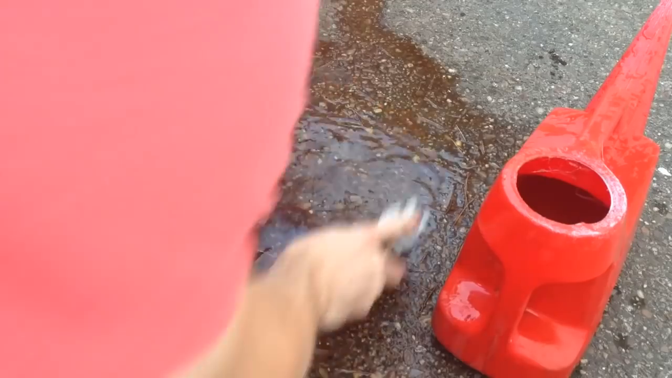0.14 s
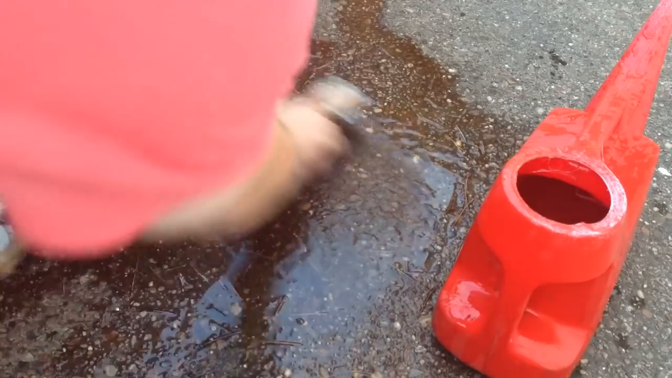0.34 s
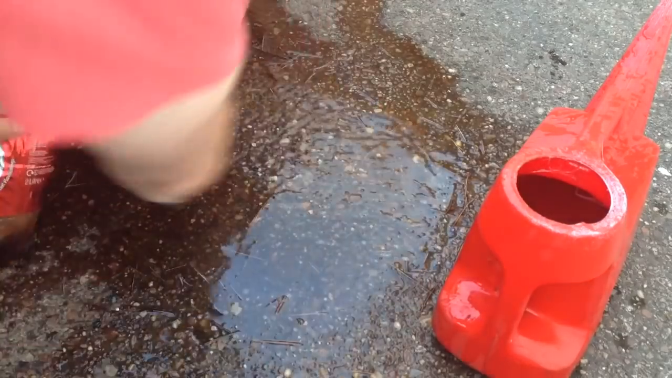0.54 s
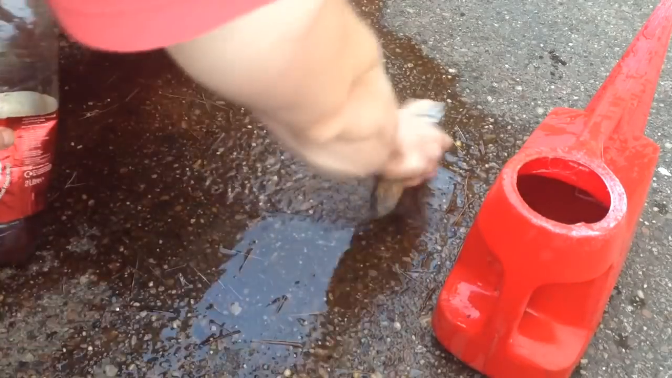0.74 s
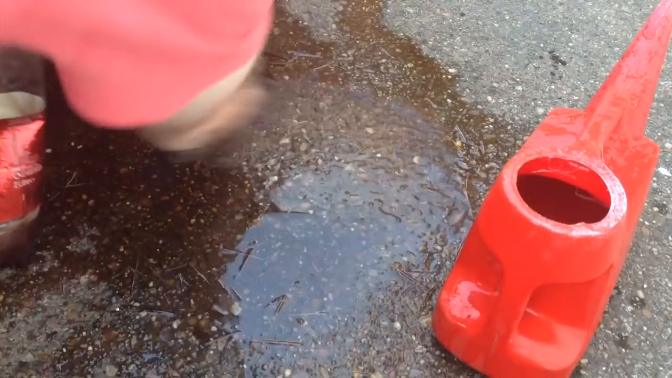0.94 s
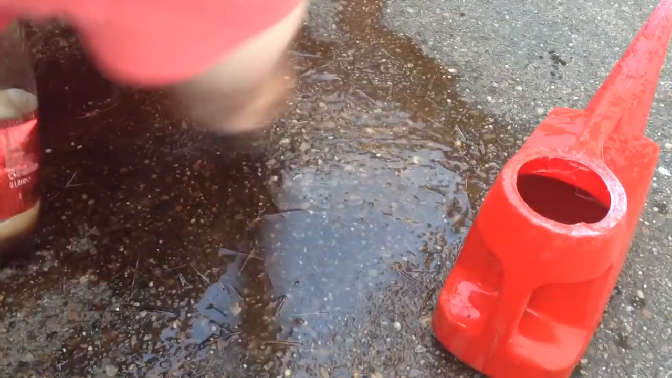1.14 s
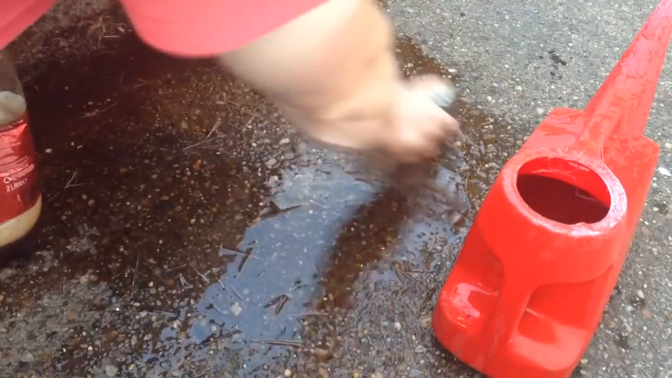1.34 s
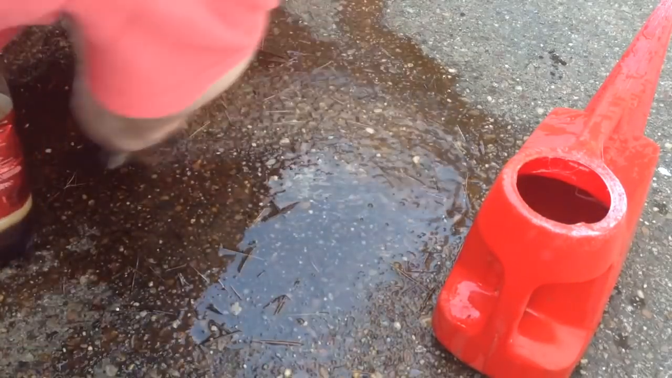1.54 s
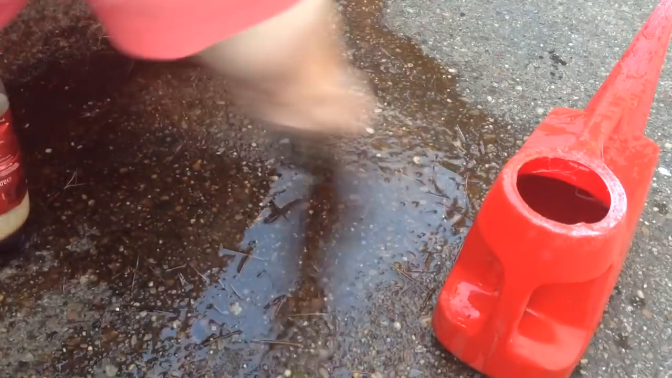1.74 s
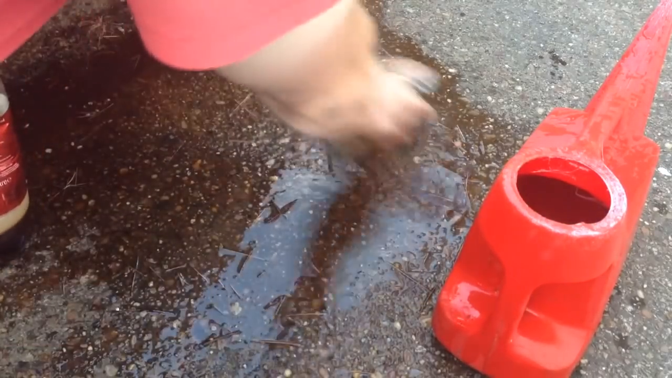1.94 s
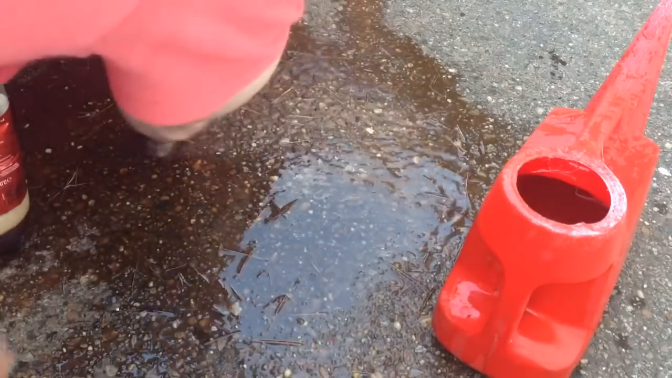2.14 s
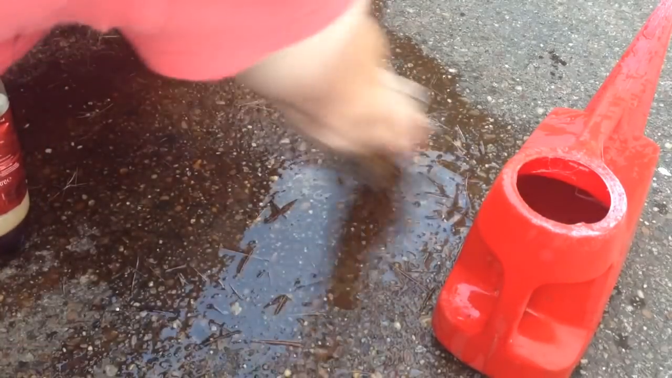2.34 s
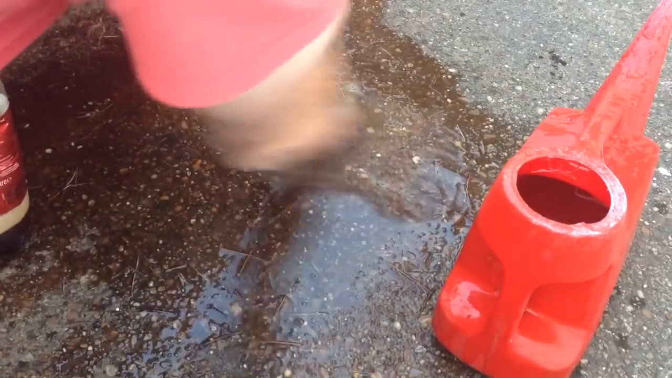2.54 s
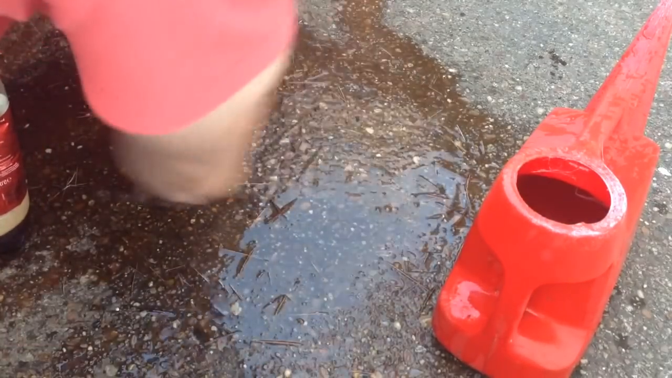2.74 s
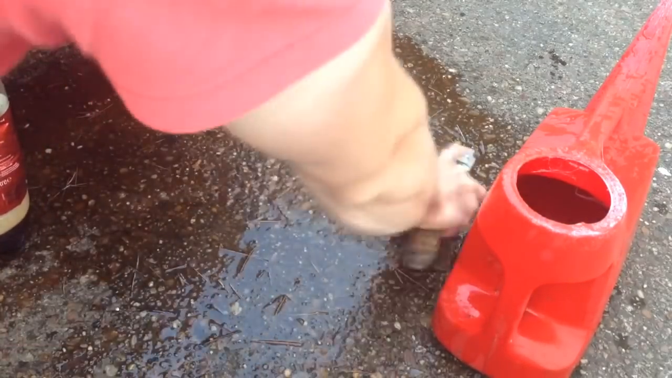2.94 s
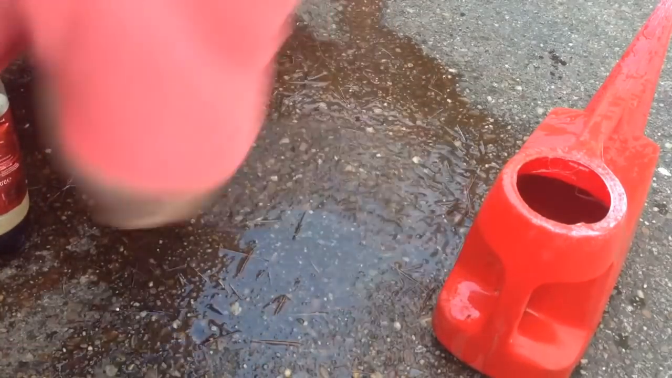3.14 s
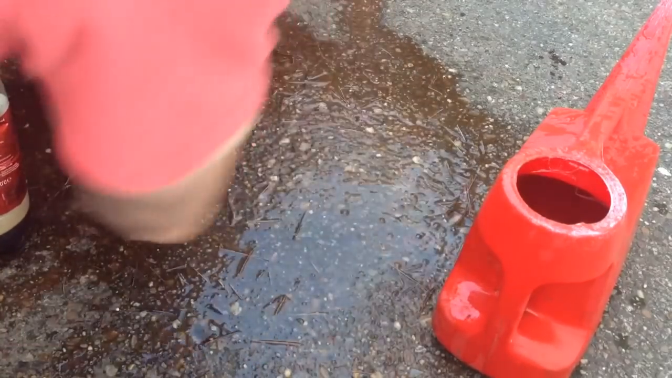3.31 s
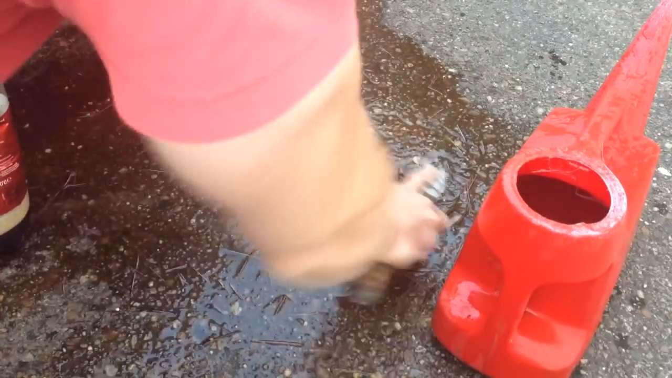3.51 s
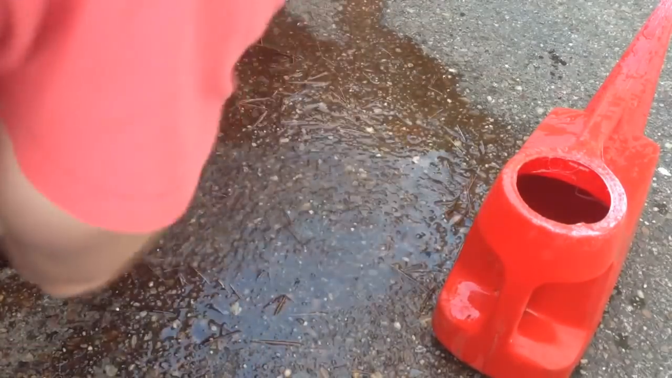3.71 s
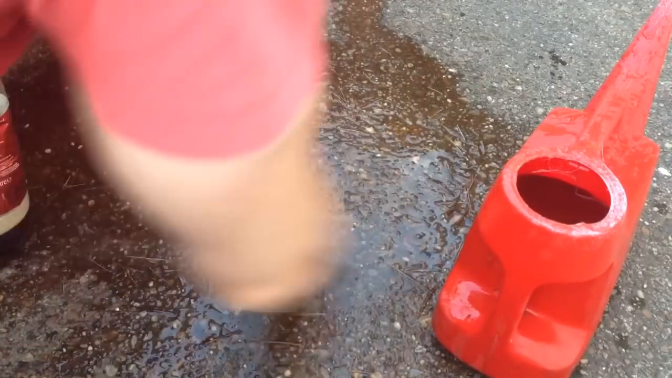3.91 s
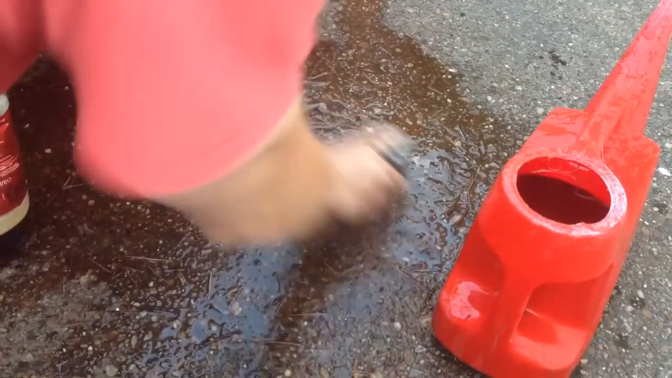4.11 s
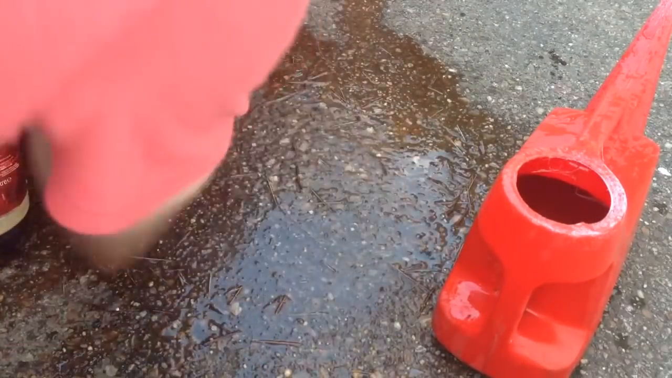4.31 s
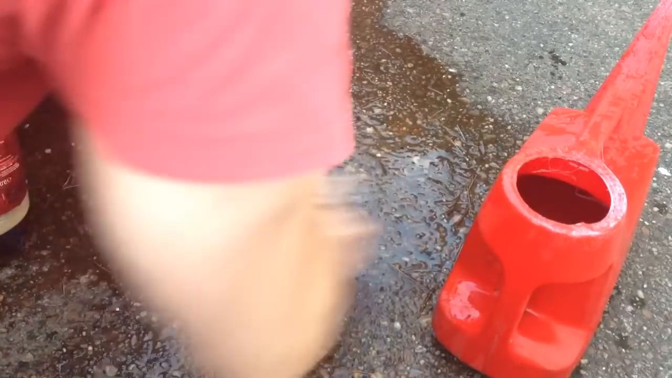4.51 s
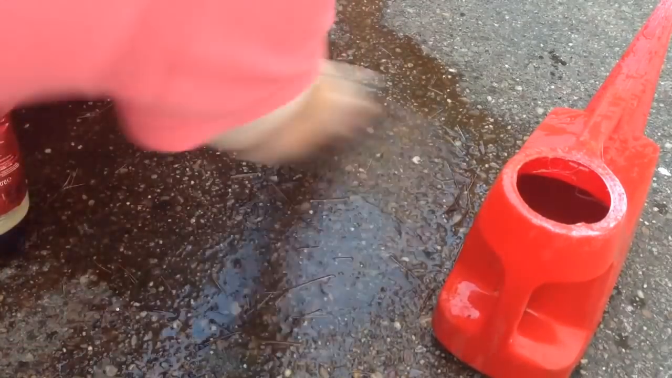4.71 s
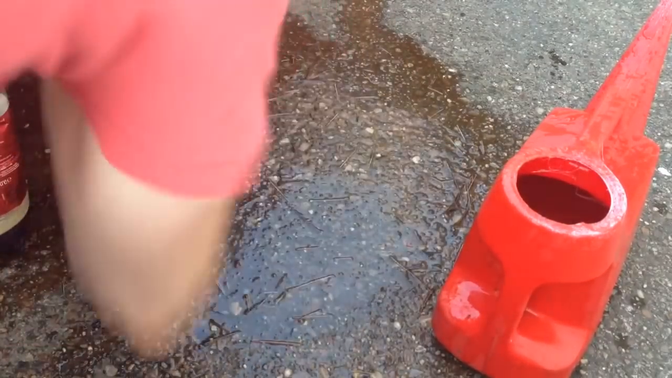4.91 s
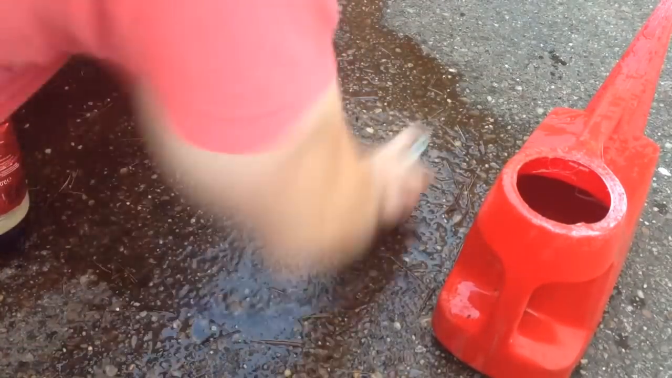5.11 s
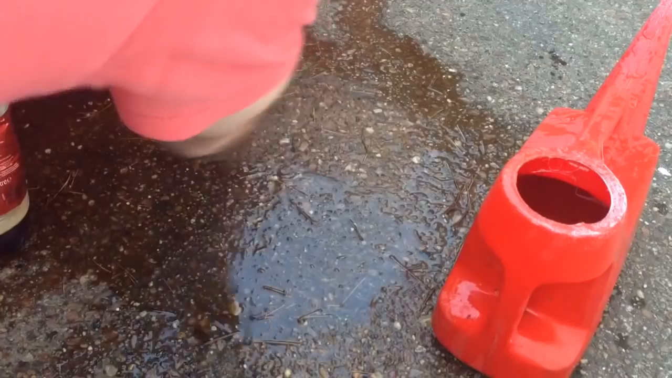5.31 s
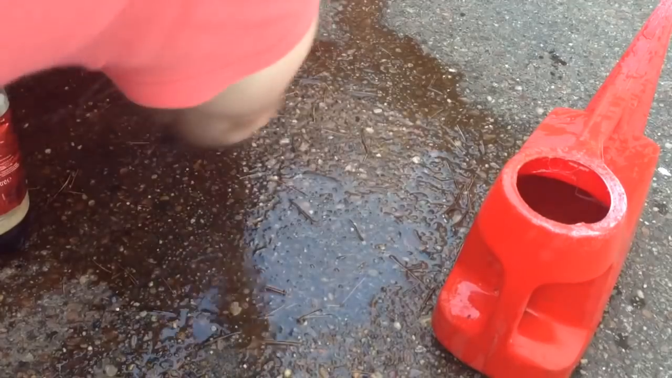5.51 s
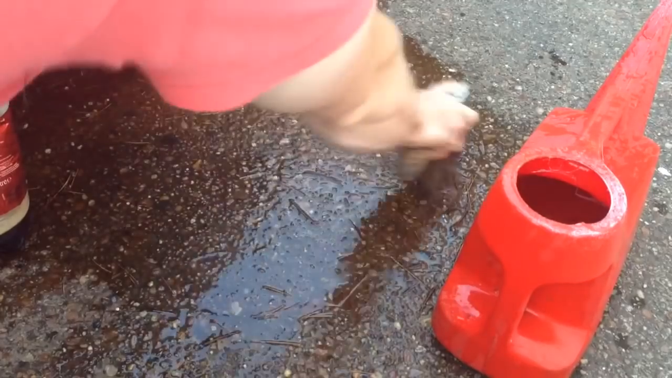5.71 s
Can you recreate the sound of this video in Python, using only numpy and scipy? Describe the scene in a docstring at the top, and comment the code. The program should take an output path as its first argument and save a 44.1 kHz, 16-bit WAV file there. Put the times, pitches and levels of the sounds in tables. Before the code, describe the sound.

After a few quiet knocks, coarse bristles scrape rapidly over soaked gritty ground, each short stroke a bright scratchy swish with wet bubbling in it. Soft low thuds and one hard wooden-sounding clack accompany the first strokes. The rhythm later becomes a continuous, uneven swirl. The microphone is near, outdoors, with hardly any echo and the same sound on both sides.

```python
"""A stiff hand brush scrubs wet concrete outdoors, over a faint bed of outdoor air.
First come light ticks and dull bumps: decaying modes of the block and short bursts of noise.
Then the brush goes back and forth: bristle tips catch on grit and flick free by the thousand
(random impulses, filtered), churning the water film (bubble rings); a sharp clack falls early on.
Later it scrubs in circles without a break, and a last stroke begins. Both channels are alike."""
import sys
import numpy as np
from scipy import signal
from scipy.fft import rfft, irfft, next_fast_len
from scipy.io import wavfile
from scipy.ndimage import map_coordinates

SR = 44100
rng = np.random.default_rng(int(sys.argv[2]) if len(sys.argv) > 2 else 0)


def wrap_up_sound(samples):
    """Save the sound to the file named by the first command line argument, as 16-bit audio."""
    columns = np.atleast_2d(samples).T
    # keep every value between -1 and 1, then stretch to whole-number steps
    tamed = np.clip(columns, -1, 1)
    steps = np.round(tamed * 32767).astype(np.int16)
    wavfile.write(sys.argv[1], SR, steps)


N = 254016  # samples

# Levels in the tables are relative: each source adds its own gain in the mix.
# Back-and-forth strokes: start t/s, length/s, attack/s, rasp level/dB, sag over the stroke/dB,
# level of the skimming before it/dB, water churn level re rasp/dB
STROKES = [ (0.305, 0.3, 0.041, -27.5, -3, -38.5, -15.5), (0.601, 0.25, 0.04, -23, -21, -39.5, -13.5),
           (0.849, 0.29, 0.125, -24.5, 12.5, -37, -10), (1.181, 0.21, 0.035, -20.5, -3.5, -40.5, -9.5),
           (1.428, 0.24, 0.064, -22.5, 2.5, -41.5, -10), (1.657, 0.29, 0.17, -21.5, 1, -50, -9.5),
           (1.975, 0.28, 0.098, -26, 9.5, -43, -11), (2.244, 0.28, 0.12, -24, 2.5, -53, -11),
           (2.556, 0.27, 0.046, -25.5, 16, -41, -12), (2.83, 0.23, 0.068, -22, 5, -44, -11.5),
           (3.108, 0.23, 0.033, -22, 2.5, -41.5, -10.5), (3.381, 0.23, 0.053, -23.5, 3, -41, -11.5),
           (3.659, 0.21, 0.041, -22.5, 9, -41.5, -8), (3.912, 0.21, 0.059, -22.5, 7, -44.5, -13),
           (5.512, 0.28, 0.086, -22.5, -4.5, -52, -14)]
# Bristles turning over at some turns of the hand: t/s, rasp level/dB
BRISTLE_FLIPS = [(1.933, -27.5), (2.53, -29), (2.786, -39), (3.334, -52)]
# An unbroken spell of circles: t/s, rasp level/dB, churn level re rasp/dB, spray level re rasp/dB
CIRCLING = [(4.09, -42, -13, -5), (4.116, -39, -7, -4), (4.156, -29, -10.5, -11), (4.208, -23.5, -7, -6),
            (4.422, -31.5, -9.5, -5), (4.468, -23.5, -10.5, -9.5), (4.572, -22, -12.5, -8),
            (4.682, -27.5, -4.5, -5.5), (4.754, -21.5, -9, -6), (4.852, -29.5, -3, -2),
            (4.888, -24.5, -11, -5.5), (4.948, -34, -3, -5), (5.046, -22.5, -11, -12),
            (5.082, -30.5, -3.5, -7.5), (5.324, -28, 0, -6), (5.434, -30.5, -6.5, -6),
            (5.478, -37, -9, -4.5), (5.51, -58, -6, -6)]

# Spectral shapes, as filter gains: f/Hz, level/dB
RASP_SHAPE = [(880, -37.5), (1500, -13), (1790, -6), (2200, -9.5), (2520, -4), (3340, -1), (3830, -1),
              (4850, -3), (6250, -1.5), (12900, -14.5), (14800, -22), (15500, -32)]  # bristles on grit
FILM_SHAPE = [(400, -43), (750, -33), (1000, -13.5), (1300, -10.5), (1800, -0.5), (2150, 0.5), (2900, -9),
              (5000, -40)]  # bubbles in the water film
WAVE_SHAPE = [(400, -42), (750, -12), (1000, -18.5), (1280, -3), (1550, -8), (2000, 2), (3000, -42)]  # bubbles in the pushed water
SPRAY_SHAPE = [(4000, -40), (6800, -2), (8300, 0.5), (10500, -1.5), (13000, -4), (15500, -8.5)]  # fine spray
RUMBLE_SHAPE = [(30, -23), (90, -19), (170, -2), (300, -6), (450, -1), (900, 0), (1600, -15.5)]  # shaken brush block
SCUFF_SHAPE = [(60, -21), (200, -16), (450, 8.5), (750, -3), (1200, 7), (2000, -6), (4000, -29),
               (9000, -52)]  # contact noise of the bumps
AIR_SHAPE = [(25, -11), (70, -8.5), (200, -8), (500, -12.5), (1200, -22), (4000, -18), (15000, -18.5)]  # outdoor background

# Bristle resonances: f/Hz, width of one resonator/Hz, level/dB
TUFT_MODES = [(2420, 380, -0.5), (2893, 300, 0.5), (3830, 460, 3.5), (4256, 270, -3), (6160, 530, -5.5)]
# Dull bumps: t/s, level/dB, f/Hz, t60 of the swing/s, contact noise level re bump/dB
BUMPS = [(0.001, -36, 75.4, 0.038, -33), (0.071, -47, 260, 0.029, -3), (0.148, -37, 300, 0.017, -30),
         (0.221, -42, 273, 0.027, -1.5), (0.569, -26.5, 203, 0.032, -21.5), (0.616, -17, 206, 0.036, -28),
         (0.677, -22.5, 295, 0.035, -3), (0.706, -32.5, 184, 0.07, -10), (0.878, -42, 103, 0.068, -25.5),
         (0.985, -40, 240, 0.03, -17), (1.080, -34.5, 204, 0.044, -1), (1.256, -47, 221, 0.071, -20),
         (1.571, -25.5, 197, 0.033, -7.5), (1.606, -44.5, 218, 0.12, 2), (1.829, -37.5, 185, 0.067, -1),
         (3.32, -57, 119, 0.17, 0), (3.99, -55, 64.5, .2, -6)]
# Hard contacts of the brush: t/s, peak level/dB, pitch re the block's modes, t60/s
CLACKS = [(0.031, -39, 2.8, 0.01), (0.087, -42, 1, 0.047), (0.187, -44, 2.2, 0.0088),
          (0.196, -37.5, 1.7, 0.02), (0.215, -38, 3.4, 0.0064), (0.6777, -7, 1.06, 0.029),
          (0.690, -18, 0.87, 0.03), (2.542, -27, 1.6, 0.021), (3.344, -27, 2, 0.016)]
# Modes of the brush block: f/Hz, level/dB
BLOCK_MODES = [(1570, -8), (2020, -4), (2330, 7), (2620, 5.5), (3800, -3), (4500, -5)]

RELEASE_S, ARCH_DB = 0.097, 4  # the hand slows before each turn; both ends lie under the middle
PILE_UP_DB = 4.6  # more water is churned as it piles up ahead of the brush
SKIM_S, SKIM_FADE_S, SKIM_CHURN_DB = 0.06, 0.023, -19  # tips skim the wet ground before they bite
SPRAY_DB = -5.5  # nominal level of strokes' fine spray re rasp
FLIP_ATTACK_S, FLIP_T60_S = 0.016, 0.18
CIRCLING_DB, CIRCLING_FADE_S = 1, 0.02
TOUCH_S, REST_DB, REST_CHURN_DB = 0.19, -50.5, -6  # once down, the brush never leaves the water
TOP_HZ = 15480  # upper band limit


def scrubbing():
    """Stick-slip friction: faster strokes flick more bristles, churn more water and shake the block."""
    rasp_db, churn_db, spray_db = hand()
    speed = amp(0.5 * (rasp_db - rasp_db.max()))  # 1 at the loudest moment
    rate = 1200 + 12000 * speed  # flicks per second
    layers = bristles(rate, speed, rasp_db, churn_db)
    layers += amp(rasp_db + spray_db + 0.5) * coloured(flicks(rate, scatter_db=3.0), SPRAY_SHAPE)
    layers += amp(rasp_db + churn_db - 1.6) * water(churn_db)
    layers += rumble(rate, rasp_db + churn_db)
    return snags(rate=130, life=0.0067, depth=0.17) * layers


def hand():
    """Power addition of all moves, giving levels in dB: rasp, then churn and spray re rasp."""
    t = np.arange(N) / SR
    # each move: rasp gain, churn dB re rasp, spray dB re rasp
    resting = amp(REST_DB) * ease((t - TOUCH_S) / SKIM_FADE_S)
    moves = [(resting, REST_CHURN_DB, SPRAY_DB)]
    for start, length, attack, db, sag_db, skim_db, churn_db in STROKES:
        age = t - start
        travel = np.clip(age / length, 0, 1) - 0.5  # -0.5 to 0.5 along the stroke
        push_db = db - sag_db * travel - ARCH_DB * (2 * travel) ** 2
        push = ease(age / attack) * ease((length - age) / RELEASE_S) * amp(push_db)
        moves.append((push, churn_db + PILE_UP_DB * travel, SPRAY_DB))
        skim = ease((age + SKIM_S) / SKIM_FADE_S) * ease((attack - age) / SKIM_FADE_S)
        moves.append((skim * amp(skim_db), SKIM_CHURN_DB, SPRAY_DB))
    for start, db in BRISTLE_FLIPS:
        age = t - start
        flip = ease(age / FLIP_ATTACK_S) * amp(db - 60 * np.maximum(age, 0) / FLIP_T60_S)
        moves.append((flip, SKIM_CHURN_DB, SPRAY_DB))
    rasp_db, churn_db, spray_db = curves(CIRCLING)
    fade_in = ease((t - CIRCLING[0][0]) / CIRCLING_FADE_S + 1)
    fade_out = ease((CIRCLING[-1][0] - t) / CIRCLING_FADE_S + 1)
    moves.append((fade_in * fade_out * amp(rasp_db + CIRCLING_DB), churn_db, spray_db))
    # tiny floors keep the logarithm finite
    rasp = sum(gain ** 2 for gain, _, _ in moves) + 1e-12
    churn = sum((gain * amp(db)) ** 2 for gain, db, _ in moves) + 1e-14
    spray = sum((gain * amp(db)) ** 2 for gain, _, db in moves) + 1e-14
    return 10 * np.log10([rasp, churn / rasp, spray / rasp])


def bristles(rate, speed, rasp_db, churn_db):
    """Impulse excitation: flicking tips give a broadband rasp and set the tufts ringing."""
    rasp = coloured(flicks(rate, scatter_db=0.5), RASP_SHAPE)
    rasp = patchy(rasp, width_hz=47, life=0.015, depth_db=1.95)
    rasp = filtered(rasp, lambda hz: 1 / np.sqrt(1 + (hz / 8000) ** 8))
    # slow bristles at the turnarounds ring more freely than hard-pressed ones
    ring = amp(-5.5 - 5.1 * speed) * tufts(rate, swell_db=3.5)
    both = amp(rasp_db + 0.62) * (amp(-0.33) * rasp + ring)
    # below -8.5 dB of churn, the less water is churned, the more the rasp loses its lower part
    thinning = 1 - amp(0.65 * np.minimum(churn_db + 8.5, 0))
    return both - thinning * filtered(both, lambda hz: 1 / np.sqrt(1 + (hz / 2800) ** 12))


def flicks(rate, scatter_db):
    """Shot noise of mean power 1: bristle tips slip off grit at random, rate a second."""
    chance = np.clip(rate / SR, 1e-4, 1)  # per sample
    strengths = amp(scatter_db * np.clip(rng.standard_normal(N), -2, 2))
    sizes = unit(strengths * rng.choice([-1, 1], N))
    return (rng.random(N) < chance) * sizes / np.sqrt(chance)


def tufts(rate, swell_db):
    """Resonance: each group of bristles rings at its own pitch, and takes the load in turn."""
    out = np.zeros(N)
    for hz, width, db in TUFT_MODES:
        def resonance(f):
            damping = 1j * f * width
            return (damping / (hz * hz - f * f + damping)) ** 2
        ring = filtered(flicks(rate, scatter_db=4.5), resonance)
        out += amp(db + swell_db * wobble(12)) * unit(ring)
    return unit(out)


def snags(rate, life, depth):
    """Relaxation: tufts catch and let go; each release lifts the level at once, then dies away."""
    releases = (rng.random(N) < rate / SR) * rng.uniform(0.21, 1, N)
    fading = signal.lfilter([1], [1, -np.exp(-1 / (life * SR))], releases)
    return unit(1 + depth * fading)


def water(churn_db):
    """Bubble resonance: larger bubbles ring lower, and a deeper wave of water holds more of them."""
    film = bubbles(count=7000, centre_hz=1677, spread=0.289, cycles=18.3, scatter_db=-1.5)
    wave = bubbles(count=3500, centre_hz=1273, spread=0.27, cycles=15.6, scatter_db=3.0)
    wave_gain = amp(0.18 * churn_db - 9.5)
    both = coloured(film, FILM_SHAPE) + wave_gain * coloured(wave, WAVE_SHAPE)
    return patchy(both, width_hz=42, life=0.017, depth_db=3.5)


def bubbles(count, centre_hz, spread, cycles, scatter_db):
    """Damped oscillation: tiny bubbles, each a short ring that rises in pitch."""
    t = np.arange(SR // 80) / SR
    start = rng.integers(0, N, (count, 1))
    pitch, size = rng.standard_normal((2, count, 1))
    turns = centre_hz * np.exp(spread * pitch) * t
    age = np.minimum(turns / cycles, 2)  # 1 when the ring has fallen by 60 dB
    decay = amp(scatter_db * np.clip(size, -2, 2) - 60 * age)
    rings = decay * np.sin(2 * np.pi * turns * (1 + 0.088 * age))
    return np.bincount((start + np.arange(len(t))).ravel(), rings.ravel())[:N]


def rumble(rate, drive_db):
    """Forced vibration: sparser impulses shake the block, harder as rasp and churn grow."""
    return amp(0.65 * drive_db - 30.0) * coloured(flicks(rate / 4, scatter_db=3.5), RUMBLE_SHAPE)


def bumps():
    """Damped modes of soft blows: a few low cycles, a ragged shudder near them and a short scuff."""
    out, t = np.zeros(N), np.arange(SR // 4) / SR
    for start, db, hz, t60, noise_db in BUMPS:
        swing = np.sin(2 * np.pi * hz * t) * amp(7.0 - 60 * t / t60)
        shape = [(hz / 4, -22), (hz * 1.6, 0), (hz * 1.82, -4), (hz * 4, -35), (hz * 12, -80)]
        shudder = coloured(rng.standard_normal(len(t)), shape)
        shudder *= amp(0.27 * noise_db - 6.5 - 30 * t / t60)
        body = (swing + shudder) * (1 - np.exp(-t / 0.0028)) ** 2
        scuff = coloured(rng.standard_normal(len(t)), SCUFF_SHAPE)
        scuff *= (1 - np.exp(-t / 0.00052)) * amp(noise_db - 60 * t / 0.067)
        add(out, start, amp(db) * (body + scuff))
    return out


def clacks():
    """Modal impact: block and loose grit strike the concrete, brief modes inside a dense crack."""
    out, t = np.zeros(N), np.arange(SR // 8) / SR
    for start, db, pitch, t60 in CLACKS:
        ring = np.zeros(len(t))
        for hz, level in BLOCK_MODES:
            phase = 2 * np.pi * (hz * pitch * t + rng.random())
            ring += amp(level + rng.normal(0, 1)) * np.sin(phase)
        shape = [(500 * pitch, -10), (2400 * pitch, 0), (5000 * pitch, -4), (7500 * pitch, -18)]
        crack = coloured(rng.standard_normal(len(t)), shape) * amp(-60 * t / 0.034)
        blow = (ring + 1.2 * crack) * (1 - np.exp(-t / 0.00054)) * amp(-60 * t / t60)
        add(out, start, amp(db) * blow / np.abs(blow).max())
    return out


def yard(x, t60):
    """Diffuse scattering: convolution with decaying noise, a faint, short tail from around."""
    t = np.arange(SR // 3) / SR
    tail = rng.standard_normal(len(t)) * amp(-60 * t / t60) * (t > 0.006)
    return signal.fftconvolve(x, tail / np.linalg.norm(tail))[:N]


def outdoor_air():
    """Broadband noise: shaped random pressure whose level wanders smoothly."""
    return amp(-61.0 + 4.3 * wobble(14)) * coloured(rng.standard_normal(N), AIR_SHAPE)


def amp(db):
    """Decibel law: level to amplitude gain."""
    return 10 ** (np.asarray(db) / 20)


def unit(x):
    """Normalisation to rms 1."""
    return x / np.sqrt(np.mean(x ** 2) + 1e-20)


def ease(u):
    """Raised-cosine step: 0 to 1 as u goes from 0 to 1."""
    return np.sin(np.pi / 2 * np.clip(u, 0, 1)) ** 2


def curves(rows):
    """Linear interpolation: one value per sample for each column after the time."""
    times, *columns = np.transpose(rows)
    return [np.interp(np.arange(N) / SR, times, column) for column in columns]


def wobble(rate):
    """Spline interpolation: a smooth random curve, rate knots a second."""
    knots = rng.standard_normal(int(N * rate / SR) + 4)
    return map_coordinates(knots, [np.arange(N) * rate / SR])


def filtered(x, response):
    """Linear filtering: the spectrum of x times a response of frequency."""
    m = next_fast_len(len(x) + 8192)
    return irfft(rfft(x, m) * response(np.fft.rfftfreq(m, 1 / SR)), m)[:len(x)]


def coloured(x, points):
    """Spectral shaping by (f/Hz, level/dB) points on a log axis, at rms 1."""
    f, db = np.transpose(points)
    return unit(filtered(x, lambda hz: amp(np.interp(np.log(hz + 1), np.log(f), db))))


def patchy(x, width_hz, life, depth_db):
    """Time-frequency modulation: narrow regions swell and fade independently; rms 1."""
    z = signal.stft(x, nperseg=512)[2]
    across = signal.windows.gaussian(21, width_hz * 512 / SR)
    along = signal.windows.gaussian(41, life * SR / 256)
    field = signal.fftconvolve(rng.standard_normal(z.shape), np.outer(across, along), "same")
    return unit(signal.istft(z * amp(depth_db * unit(field)), nperseg=512)[1][:N])


def add(track, start, sound):
    """Superposition: mix a sound into the track from a start in seconds."""
    part = track[max(round(start * SR), 0):][:len(sound)]
    part += sound[:len(part)]


def scene():
    """Superposition of brush, knocks, their scatter and outdoor air, alike in both channels."""
    knocks = bumps() + clacks()
    scatter = amp(-12.0) * yard(knocks, t60=0.26)
    mono = scrubbing() + knocks + scatter + outdoor_air()
    return np.array([mono, mono])


def record(dry):
    """Band limitation: an abrupt low-pass keeps nothing above TOP_HZ."""
    return np.array([filtered(channel, lambda hz: hz < TOP_HZ) for channel in dry])


dry = scene()
out = record(dry)
wrap_up_sound(out)
```